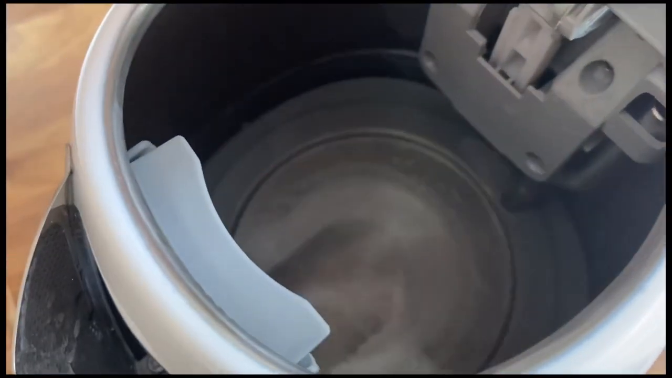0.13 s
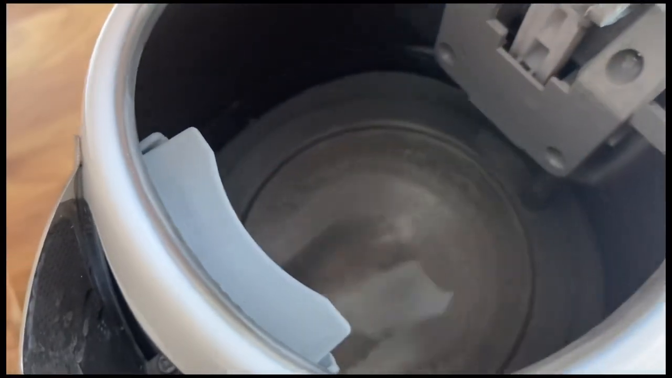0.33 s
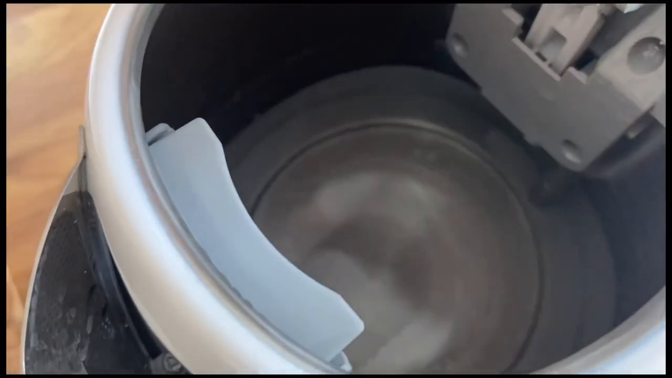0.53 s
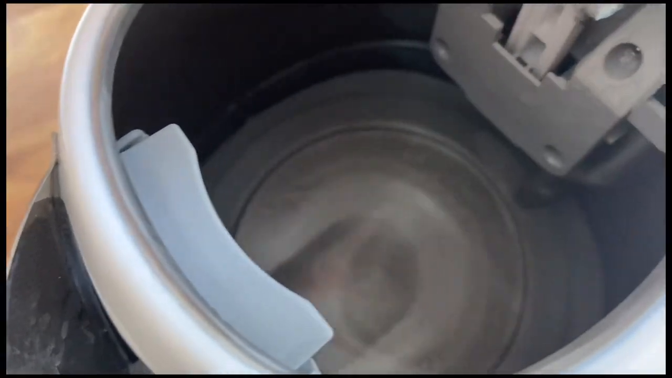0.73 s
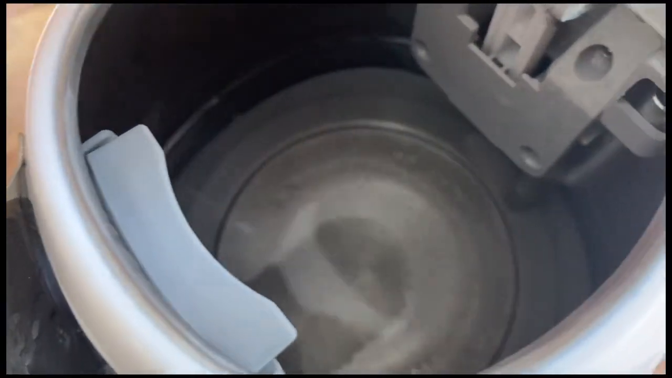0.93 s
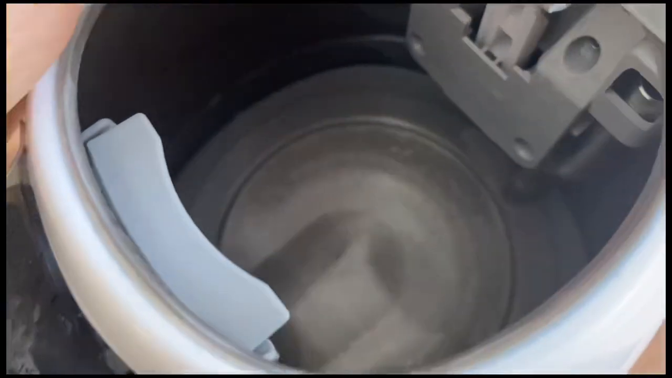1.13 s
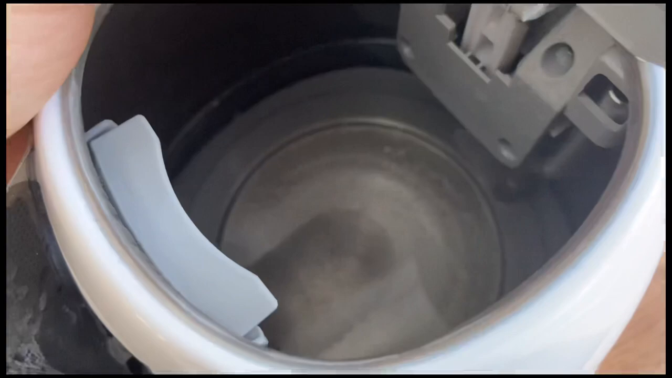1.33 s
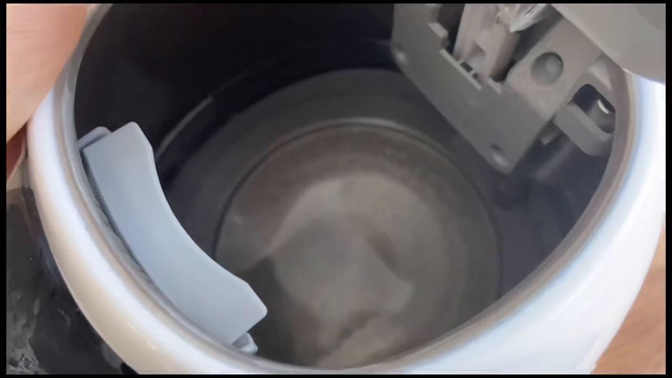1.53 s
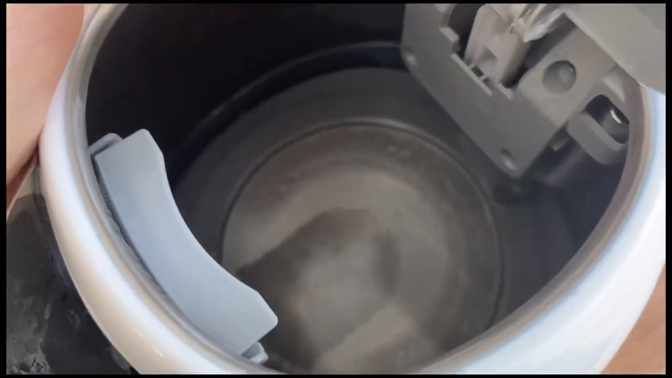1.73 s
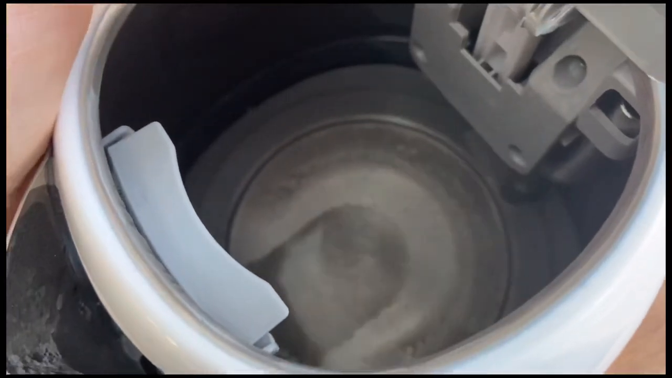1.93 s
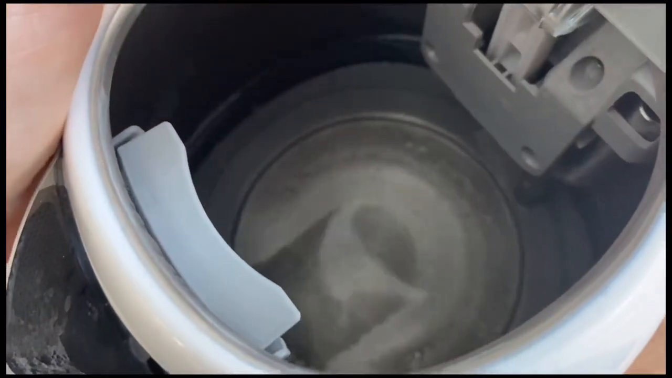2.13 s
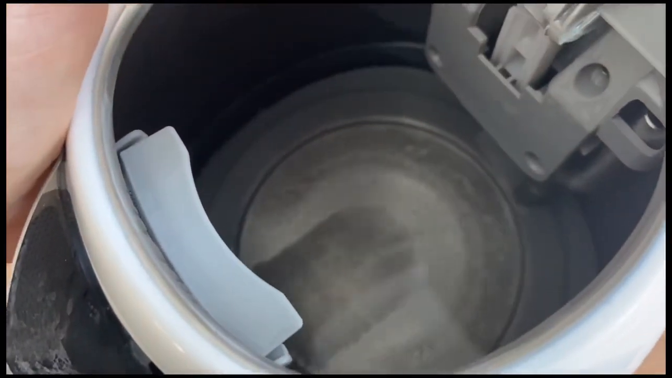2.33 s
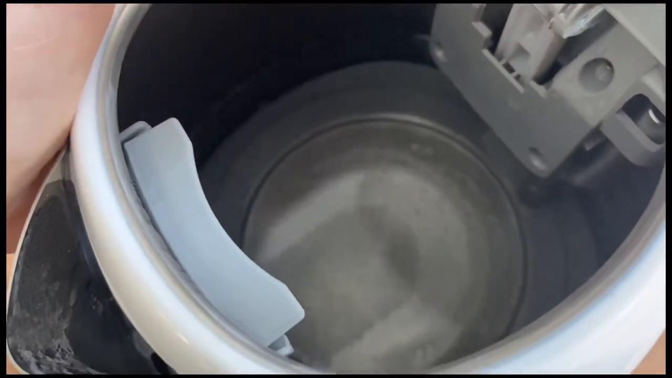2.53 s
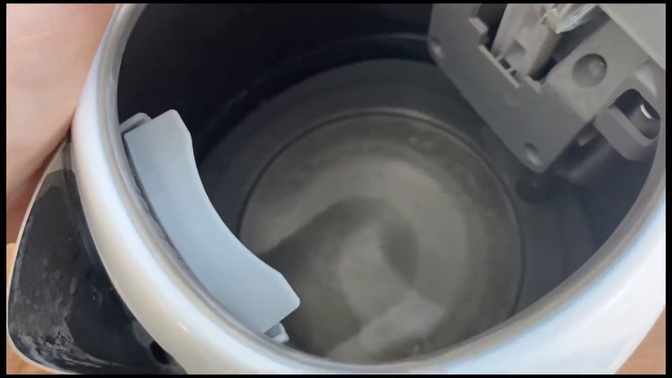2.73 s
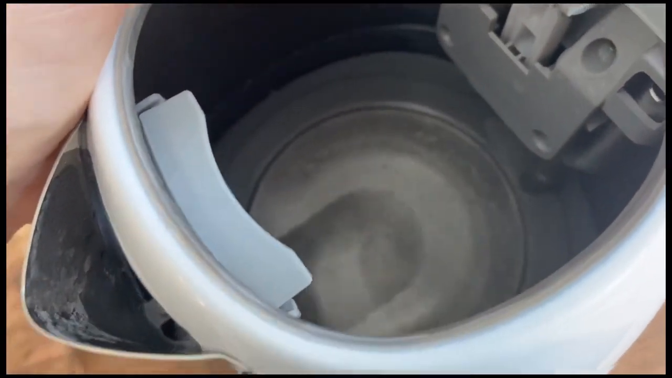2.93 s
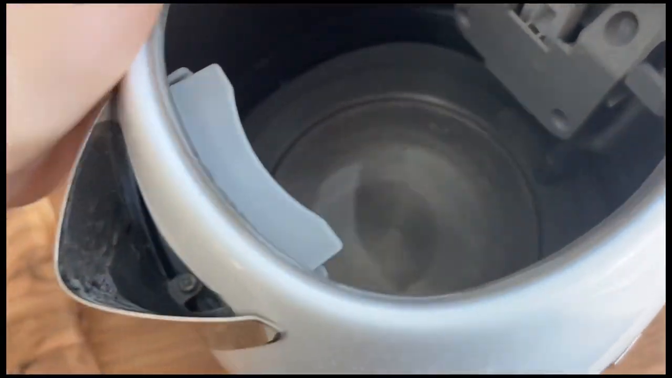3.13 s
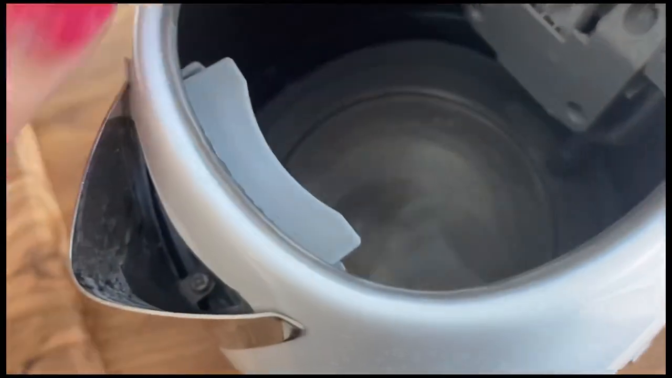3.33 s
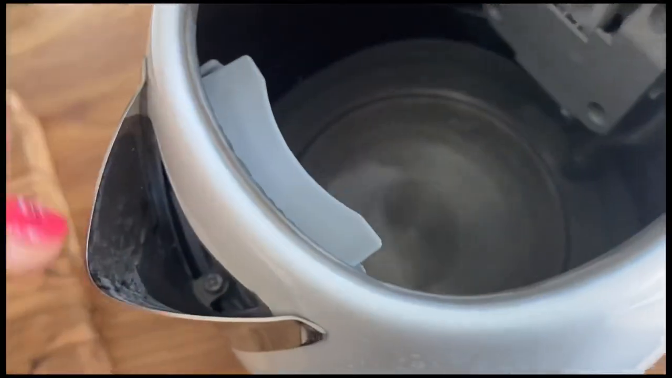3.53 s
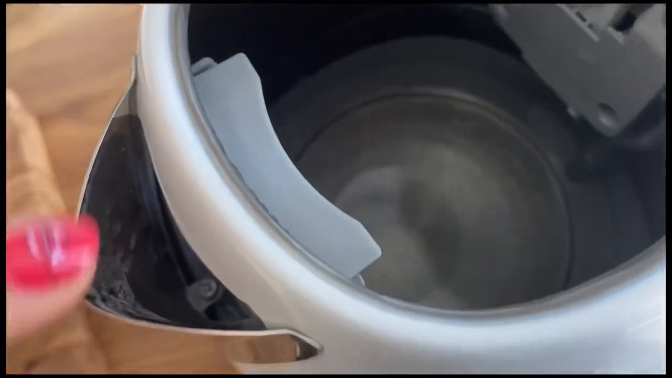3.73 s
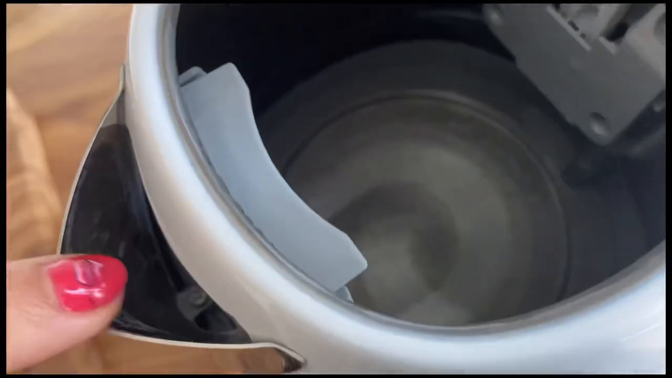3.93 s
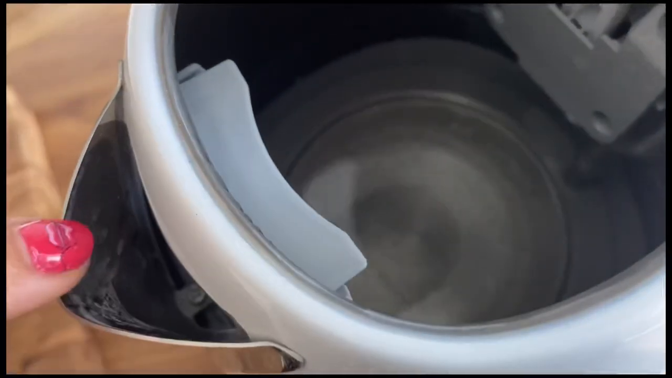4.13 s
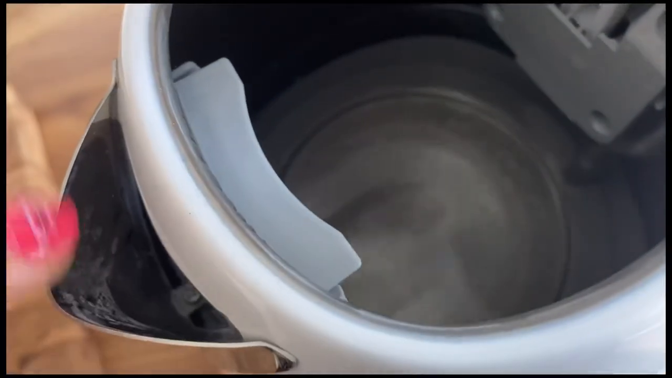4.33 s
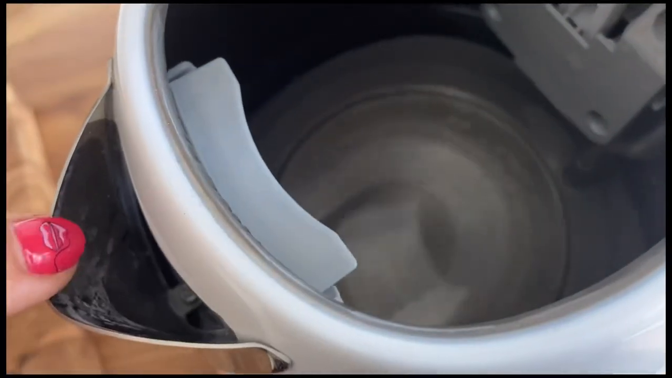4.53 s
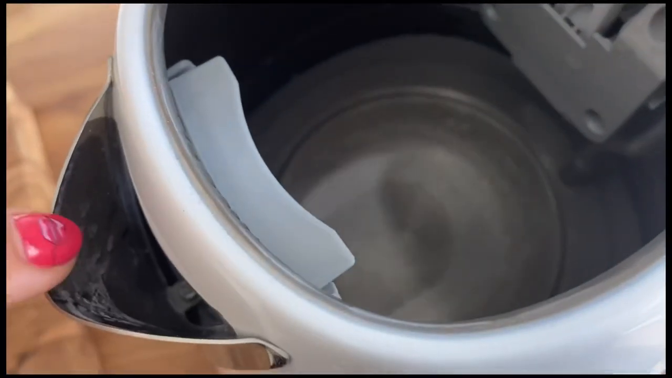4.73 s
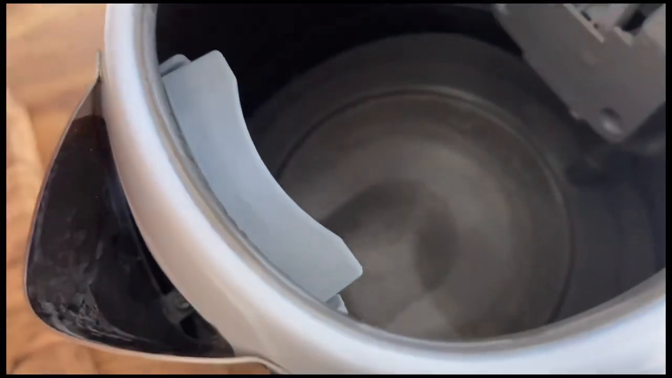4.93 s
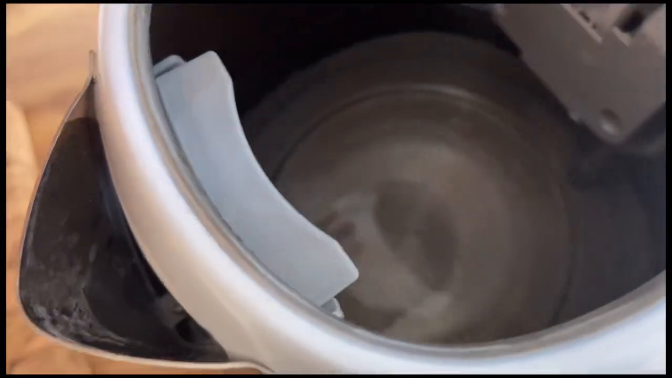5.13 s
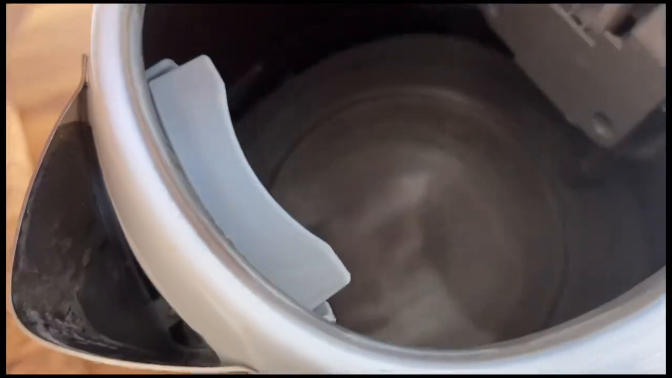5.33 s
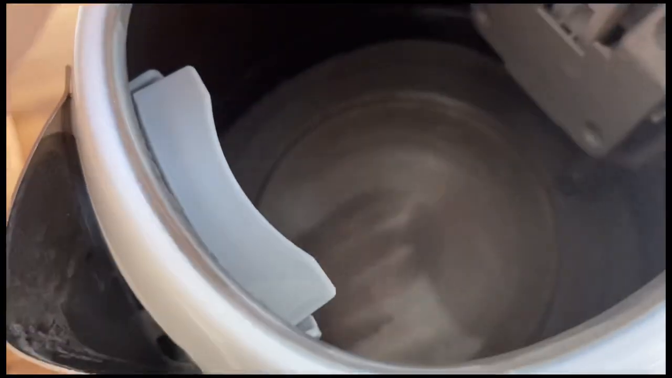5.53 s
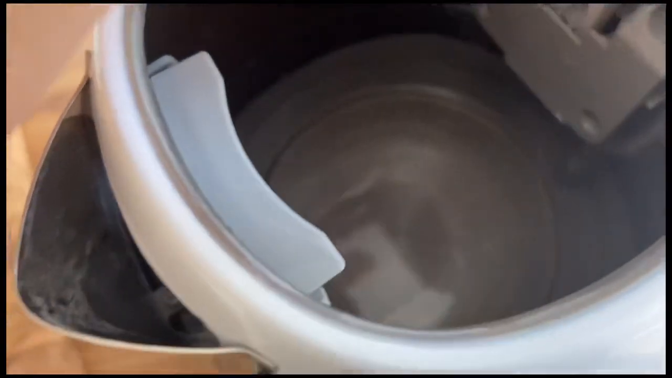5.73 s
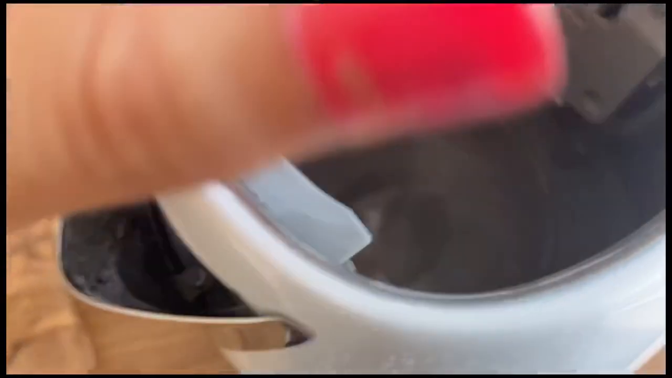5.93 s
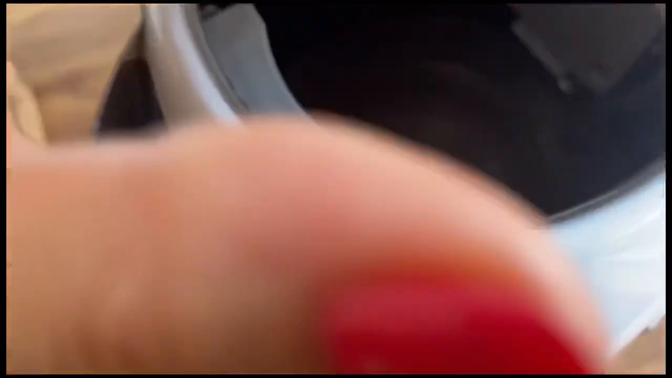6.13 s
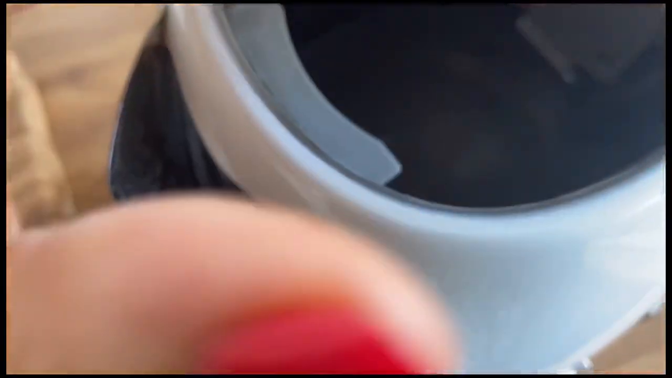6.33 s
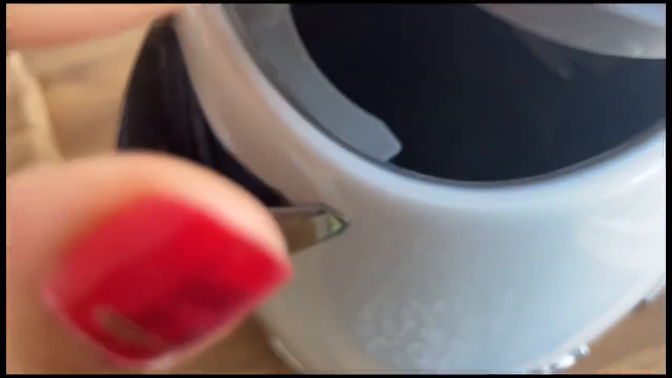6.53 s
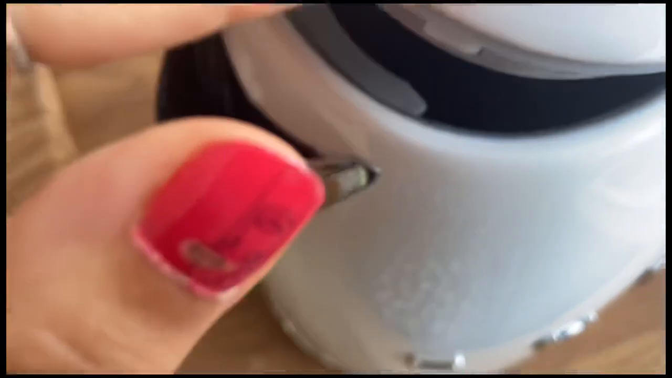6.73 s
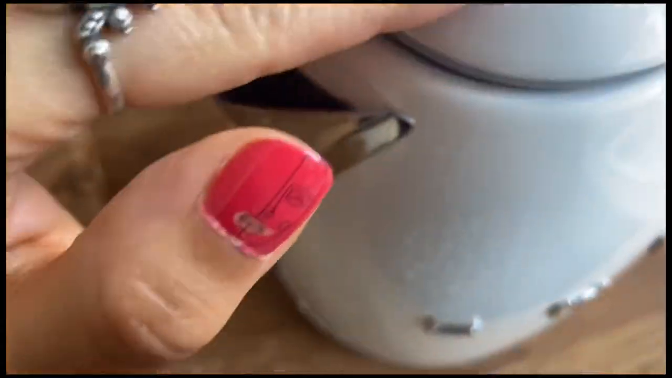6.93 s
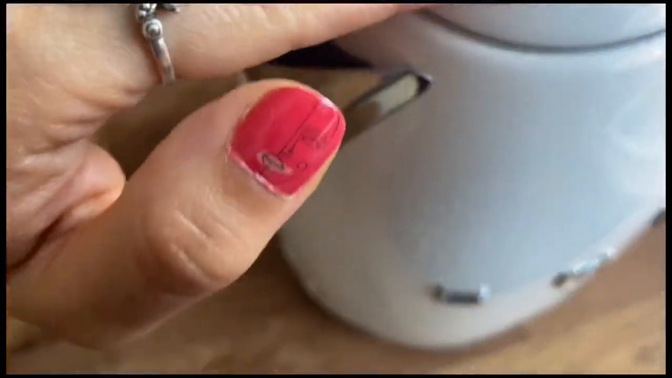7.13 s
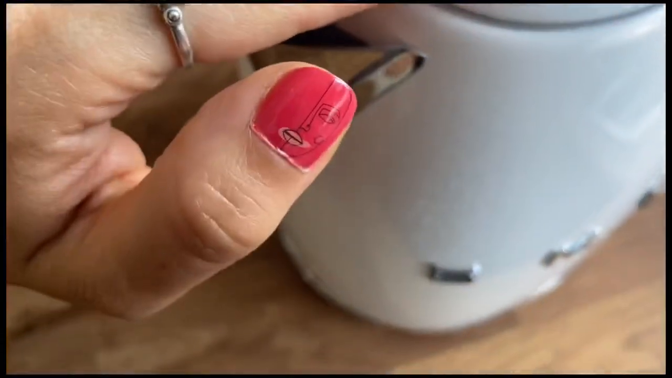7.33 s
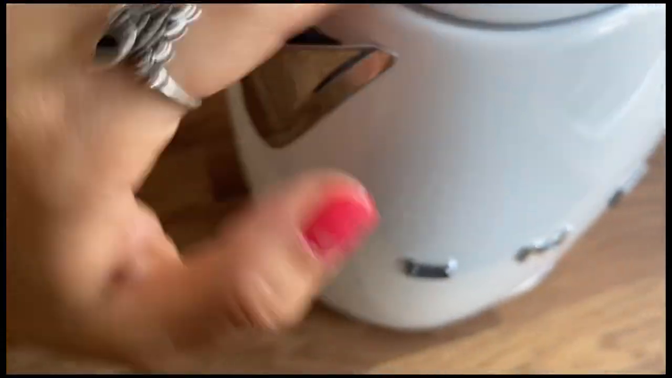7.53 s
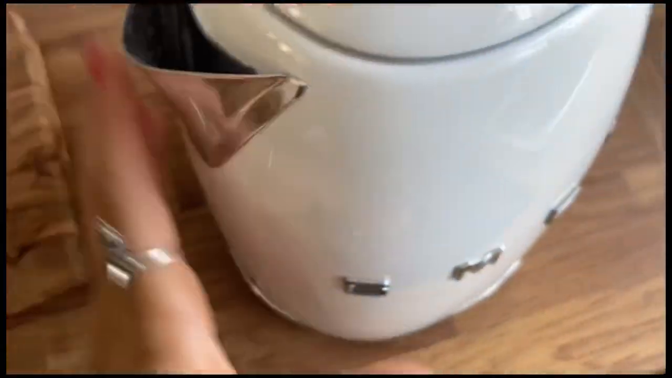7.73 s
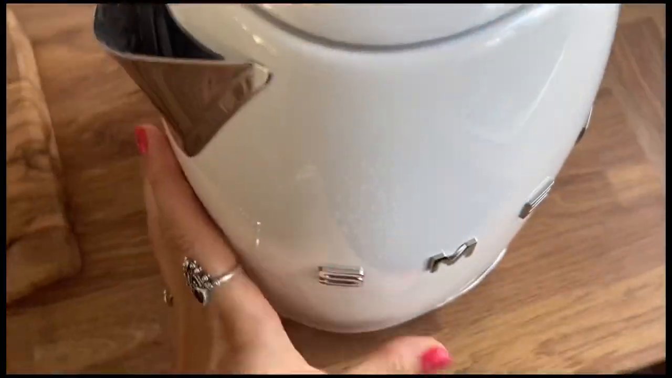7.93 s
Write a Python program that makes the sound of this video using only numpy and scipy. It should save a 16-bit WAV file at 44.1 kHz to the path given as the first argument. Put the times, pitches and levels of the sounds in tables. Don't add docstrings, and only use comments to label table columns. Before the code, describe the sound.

A quiet kitchen, heard close by a phone: low uneven rumble, faint hollow hum and thin hiss throughout. From 0 to 1.5 s only barely audible ticks and soft bumps of a hand on an empty kettle. At 1.7 s a clearer dull knock with a plastic tap booms briefly in the shell. Near silence follows until a loose run of small hollow bumps and light nail ticks at 3.1-3.5 s. Isolated faint taps come around 4.4 and 5.5 s. From 5.8 s the hand moves: skin rubs dryly on enamel, a small tick at 5.9, low soft thumps strongest near 6.2, nail ticks at 6.4 and 6.8. At 6.87 s the lid lands with a muffled clack; at 7.02 s the latch snaps, sharp and loudest, with tiny rapid rebounds, a short woody-metallic ring and room echo. Soft bumps at 7.5 and 8.0 s and faint brushes finish.

```python
import sys
import numpy as np
from scipy import signal
from scipy.fft import rfft, irfft, next_fast_len
from scipy.io import wavfile
from scipy.ndimage import uniform_filter1d

SR = 44100
rng = np.random.default_rng(int(sys.argv[2]) if len(sys.argv) > 2 else 0)


def generate_wav(signal):
    frames = np.transpose(np.atleast_2d(signal))
    scaled = np.clip(frames, -1, 1) * 32767
    pcm = np.round(scaled).astype(np.int16)
    wavfile.write(sys.argv[1], SR, pcm)


def voltage_ratio(level):
    return 10 ** (np.asarray(level, float) / 20)


N = 356019

# t/s, peak level/dB, boom f/Hz, knuckle knock level/dB
HELD_BUMPS = [(0.146, -47.5, 320, -37), (1.082, -50, 353, -38), (1.693, -34, 353, -6),
              (1.712, -39.5, 568, -10), (2.864, -58, 345, -28), (2.967, -50.5, 340, -36),
              (3.174, -49, 350, -13), (3.204, -38, 390, -2), (3.323, -48.5, 371, -24),
              (3.387, -44, 373, -4), (3.414, -51, 384, -22.5), (3.497, -47.5, 392, -17.5),
              (4.451, -51, 262.6, -37), (5.477, -44, 280, -22), (5.861, -49, 378, -3.5),
              (5.936, -29.5, 397.5, -11.5), (5.964, -42.5, 398, -12), (6.063, -40.5, 328, -30),
              (6.174, -22.5, 349, -15), (6.203, -24, 345.5, -8.5), (6.232, -67, 353, -32),
              (6.278, -35.5, 354, -15.5), (6.319, -35.5, 338, -10.5), (6.794, -41.5, 303, -7),
              (7.466, -53.5, 555, 0.5), (7.475, -35.5, 241, -17.5), (7.491, -45.5, 264, -10),
              (7.604, -50, 263, -21.5)]
# t/s, peak level/dB, boom f/Hz, knuckle knock level/dB
FREE_BUMPS = [(0.614, -50.5, 272, -9), (1.584, -39.5, 358.6, -16), (1.724, -33, 344, -2.5),
              (3.105, -41, 389, -14), (3.231, -40.5, 353.5, -9), (3.292, -45, 420, -10),
              (3.461, -47, 426, -11), (5.83, -63, 428, 6.5), (5.913, -36.5, 372, -14),
              (6.866, -21, 260.8, 2.5), (6.89, -37, 644, -29.5), (6.996, -30, 269, -23.5),
              (7.522, -54.5, 628, -17.5), (7.531, -37.5, 262, -20), (8.024, -37, 216.5, -16)]
# f/Hz, level/dB, t60/s
SHELL_MODES = [(288, 2, 0.94), (382, 3.5, 0.47), (435, 6, 0.32), (627, -22.5, 0.13), (1000, -19, 0.33),
               (1024, -17, 0.29)]
# f/Hz, level/dB, t60/s
WORKTOP_MODES = [(90, -4, 0.1), (111.5, -1.5, 0.2), (158, -6.5, 0.025)]
# t/s, peak level/dB, crowded wall modes level/dB
LID_BLOWS = [
    (6.868, -29.5, -6),
    (7.0177, -6.5, -17.5),
    (7.023, -13, -20.5),
    (7.028, -12.5, -22.5),
]
# f/Hz, level/dB, t60/s
CLOSED_MODES = [(86, -10, 0.074), (113, -3.5, 0.17), (157, 3, 0.13), (200, -13.5, 0.5), (262.6, -8.5, 0.43),
                (295, -2.5, 0.4), (403, -6, 0.31), (444, 0.5, 0.38), (548, -11.5, 0.27), (640, -7.5, 0.034),
                (706, -12, 0.11), (917, -5.5, 0.07), (1590, -35, .35)]
# t/s, peak level/dB, dull part level/dB, ring f/Hz
TAPS = [(0.5546, -85, 12, 1030), (0.894, -86, 14.5, 2330), (1.0758, -75, 9, 1400),
        (1.581, -74.5, 6.5, 1190), (1.648, -67.5, 14, 1160), (1.6574, -56.5, -21, 4500),
        (1.692, -74, 8, 1000), (1.712, -41.5, 0.5, 1220), (1.725, -26, 0, 1500), (2.2395, -68.5, -19, 4440),
        (3.2015, -56.5, 7, 1290), (3.881, -70.5, -12, 3611), (4.3137, -59.5, -27.5, 3600),
        (4.449, -61, -0.5, 2340), (5.472, -48.5, 4, 2270), (5.541, -81, 15, 2230), (5.567, -79, 17, 2200),
        (5.643, -61, 4, 2100), (5.88, -69, 1, 1740), (5.889, -38, 2.5, 3810), (5.9362, -48, 8, 1340),
        (6.1684, -55, 16, 1230), (6.267, -67, 1, 1590), (6.865, -26.5, -5, 810), (7.89, -67.5, 0.5, 1090)]
# t/s, peak level/dB, dull part level/dB, ring f/Hz
NAILS = [(6.416, -40, -7, 2280), (6.816, -42, -1.5, 2357), (0.608, -71.5, 9.5, 1040),
         (1.63, -58.5, 5, 1487), (3.1005, -55.5, -31, 4900), (3.228, -58.5, 4.5, 2350),
         (3.3693, -47, -27.5, 4700), (4.0861, -71, -16.5, 5200), (4.7483, -70.5, -7.5, 2460),
         (4.934, -74.5, -14, 1012), (5.7687, -79, 10.5, 2410), (5.829, -67, -2, 1380),
         (5.9736, -51, -8.5, 1380), (6.079, -57.5, -23, 1420), (6.0984, -55.5, 0, 1880),
         (6.197, -51.5, 3.5, 1250), (6.209, -49, -4, 1040), (6.8631, -32, 2, 1695), (7.467, -63, -7, 869),
         (7.484, -64.5, -3, 1025), (7.522, -62, -0.5, 1050), (7.6128, -72.5, -15, 1120),
         (8.021, -63.5, -0.5, 1080)]
# t/s, peak level/dB, dull part level/dB, ring f/Hz, rattle length/s
LATCH = [
    (7.0152, -26.5, 4.5, 2360, 0.0051),
    (7.0165, -22.5, 5, 5300, 0.0011),
    (7.0173, -14, -12.5, 840, 0.0013),
    (7.0232, -17, 0, 5586, 0.0024),
]
# f/Hz, level/dB, t60/s
STEEL_MODES = [(1250, -2, .04), (1640, -4, .04), (2080, -2, .04), (2350, -2, .045), (2760, -2, .04),
               (3180, -6, .03), (3870, -3, .035), (4500, -6, .03), (5200, -5, .03), (5700, -6, .025)]
# t/s, level/dB
AJAR_BLOW = (6.866, -40)
SHUT_BLOW = (7.019, -37.5)
# f/Hz, level/dB, t60/s
AJAR_MODES = [(608, -1.5, .4), (653, -3, .4), (768, -0.5, .19), (1150, -13.5, .13), (1340, -9.5, .24),
              (1700, -19, 0.21), (2008, -20.5, .27), (2175, -10.5, .22), (2400, -2.5, .16),
              (3000, -16, .15), (3740, -20.5, .19), (4230, -14, 0.2)]
# f/Hz, level/dB, t60/s
SHUT_MODES = [(614, -10, 0.35), (915, -16.5, 0.79), (1010, -15.5, 0.18), (1260, -13.5, 0.28),
              (1437, -5.5, 0.21), (1500, -20.5, 0.5), (2010, -15, 0.33), (2083, -12, 0.21),
              (2336, -15, 0.2), (2690, 0.5, 0.13), (3176, -4, 0.12), (3483, -23, 0.39), (3800, -18.5, 0.23),
              (4048, -23.5, 0.26)]
# t/s, level/dB, f/Hz, t60/s
PINGS = [(0.609, -59, 1000, .04), (0.895, -66, 2400, .04), (0.893, -68, 2830, .03), (1.075, -74, 5350, .03),
         (1.7125, -32, 1235, 0.019), (1.7242, -14.5, 1288, 0.012), (1.7273, -33.5, 2850, 0.028),
         (1.7249, -26.5, 1053, 0.034), (4.2, -76, 3190, .08), (6.271, -52, 1105, .03),
         (5.472, -49.5, 3780, .03), (6.8659, -25.5, 1730, .02), (6.865, -25.5, 792, .03),
         (6.866, -27.5, 420, .04), (7.0163, -11, 877, 0.028), (7.019, -19.5, 434, .04),
         (3.105, -63, 2390, 0.088), (3.229, -65, 1396, 0.18), (3.337, -72, 2340, 0.083),
         (3.3697, -49.5, 3580, 0.021), (3.3695, -47, 4810, 0.046), (3.3697, -43, 5900, .03),
         (3.369, -58, 2390, 0.036), (3.46, -57.5, 800, 0.027), (3.291, -58.5, 750, .03),
         (5.831, -48, 710, 0.02), (5.85, -56, 800, 0.038), (5.874, -41, 1730, 0.024),
         (5.878, -45, 844, 0.028), (5.891, -49, 2120, .04), (5.92, -46, 1300, 0.026),
         (5.938, -39.5, 2520, 0.044), (6.051, -52.5, 1000, .02), (6.053, -50, 343, 0.084),
         (6.076, -39, 405, 0.059), (6.091, -40, 388, 0.046), (6.104, -38, 370, 0.057),
         (6.121, -44.5, 382, 0.055), (6.989, -35.5, 627, 0.045), (6.999, -31.5, 680, .04),
         (7.003, -31, 1000, 0.05), (7.009, -24.5, 600, 0.04),
         (0.532, -72, 1150, .03), (0.547, -70, 900, .03), (0.557, -78, 2500, .03), (0.612, -73, 2300, .04),
         (0.615, -68, 1450, .04), (0.628, -70, 850, .05), (1.074, -70, 2500, .04), (1.074, -71, 1150, .04),
         (3.228, -62, 2050, .05), (3.203, -57, 2800, 0.032), (5.472, -51.5, 2050, 0.083),
         (5.472, -52, 4850, 0.038), (5.472, -61, 2850, 0.027), (5.567, -66.5, 3900, 0.037),
         (5.567, -65, 1900, .03), (5.643, -63, 4400, .04), (5.889, -39, 3850, 0.045),
         (5.889, -51, 6500, .03), (5.937, -48, 5150, .04), (5.937, -45, 1850, 0.056),
         (6.4165, -45, 5200, .03), (6.4165, -38, 6300, .03), (6.4165, -56, 4300, .03),
         (6.817, -46, 3850, 0.043), (6.2, -54, 4900, 0.035), (7.0245, -30.5, 2900, .02),
         (7.021, -32.5, 5400, .012)]
# t/s, level/dB
SPOUT_TOUCHES = [
    (0.624, -73),
    (1.079, -73),
    (3.226, -60.5),
    (5.482, -54),
    (5.572, -65),
    (5.643, -65.5),
]
# t of full pressure/s, hold/s, dull level/dB, sheen level/dB
STROKES = [(1.068, 0.0039, -82, -75), (1.339, .03, -88.5, -81.5), (1.472, 0.0099, -89, -73),
           (1.572, 0.039, -82, -74), (3.054, 0.14, -88, -67.5), (3.085, 0.027, -77.5, -64.5),
           (3.211, 0.014, -66.5, -71), (3.339, 0.03, -79, -71), (5.87, 0.017, -65, -77),
           (6.419, 0.003, -71.5, -65), (6.865, .005, -54.5, -87), (7, 0.014, -49.5, -53.5),
           (7.621, 0.011, -98.5, -78.5), (7.787, 0.032, -92, -72), (7.904, 0.0054, -76.5, -73),
           (7.957, 0.036, -99, -66.5), (8.029, 0.01, -76.5, -75.5), (8.041, 0.029, -76, -85)]
# t/s, pressure level/dB, sheen over dull level/dB
SLIDE = [
    (5.81, -95.5, 10),
    (5.83, -62, -2),
    (5.99, -61.5, -22),
    (6.03, -67, -1.5),
    (6.16, -65, -9.5),
    (6.32, -62.5, -2.5),
    (6.6, -64.5, -5),
    (6.8, -61.5, -9.5),
    (6.99, -71.5, -16),
]
# f/Hz, level/dB
RUB_COLOUR = [(700, -2.5), (1000, -14), (1250, -15), (1400, 0), (1550, -4), (1800, -3), (2050, -7),
              (2400, -5), (2650, -9), (3300, -18), (3800, -11.5), (4500, -38.5)]
# f/Hz, level/dB
RUB_SHEEN = [(2500, -31), (4000, -5.5), (5500, -3.5), (8000, 1), (11000, -5.5), (14000, -7.5), (15600, -12),
             (15900, -46)]
# f/Hz, width/Hz, level over the hiss/dB
SUNG_MODES = [(800, 60, 4.5), (1376, 33, 5.5), (1640, 64, 6), (1900, 40, 5), (2050, 40, 4), (2230, 66, 4.5),
              (2380, 62, 4.5), (2870, 50, 8)]
# t/s, then level/dB in each clap band
CLAPS = [
    (1.7245, -21.5, -24, -23.5, -35.5),
    (6.866, -30, -28, -28, -30),
    (7.018, -18, -20, -16, -16),
]
CLAP_HZ = (1200, 2800, 4600, 10000)
# f/Hz, t60/s, level/dB
ROOM = [(300, 0.9, -14), (750, 0.29, -14.5), (1300, 0.53, -13), (3150, .35, -9), (5900, 0.23, -21.5),
        (10300, 0.4, -14)]
# f/Hz, level/dB
CLOSE_TREBLE = [(2500, 1), (4000, -1), (12000, -2.5), (13000, -10), (14300, -9.5), (15000, 0.5)]
# t/s, left minus right level/dB
PLACE = [
    (0, -1),
    (3.3, 1.5),
    (6.2, -1),
    (6.9, -2),
    (7.05, -2.5),
    (8.07, -2),
]
# f/Hz, phase/rad
PORT_LEAD = [(0, 0.45), (1700, 0.08), (2500, 1.7), (4200, 1.42), (5400, 0.69), (6700, 3.525), (8300, 3.43),
             (16000, 13.5)]
# f/Hz, phase/rad
LID_LEAD = [(0, 0), (350, -0.33), (730, 0.84), (2500, 0.5), (4200, 2), (5200, 6.5), (8100, 10.5),
            (16000, 17.5)]
# f/Hz, level/dB
SUM_COLOUR = [(6500, -1), (6900, -45), (8050, -45), (8300, 0.5), (12200, 1), (12600, -45), (14300, -45),
              (14600, -1.5), (15700, -2), (15950, -45)]
# f/Hz, level/dB
DIFFERENCE_COLOUR = [(60, -13), (150, -9.5), (600, 3.5), (3000, -2), (5000, -4), (8800, 2), (9400, -14.5),
                     (10800, -19.5), (11500, 1)]
# t/s, level below 100 Hz/dB, length/s
SHAKES = [(0.219, -45, 0.083), (0.455, -71, .06), (0.597, -57, 0.12), (1.467, -59, 0.38),
          (1.654, -55, 0.14), (2.292, -55.5, 0.2), (3.499, -57.5, 1), (3.991, -53.5, 0.1),
          (4.212, -57.5, 0.13), (4.515, -54.5, 0.18), (4.838, -52.5, 0.11), (5.054, -60, 0.072),
          (5.312, -59, 0.059), (5.442, -46.5, 0.1), (5.927, -55, 0.13), (6.06, -44.5, 0.11),
          (6.199, -39.5, 0.081), (6.417, -51.5, 0.24), (6.678, -50.5, 0.084), (6.853, -51, 0.09),
          (7.052, -53, 0.23), (7.326, -72, 0.039), (7.51, -54.5, 0.15), (7.704, -69, 0.22)]
# f/Hz, level per Hz/dB
HUM_COLOUR = [(59, -34), (100, 0), (205, -10), (257, -2), (291, -4), (356, -2), (383, -5.5), (485, -19.5),
              (531, -19.5), (605, -32.5), (700, -31.5), (910, -44), (1540, -120)]
# t/s, level/dB
HUM_LEVEL = [(0, -62), (2, -64), (3, -61), (3.4, -58), (3.7, -63.5), (5.7, -62), (6.1, -55), (6.8, -61.5),
             (7.4, -61.5), (7.8, -62), (8.07, -66.5)]
# f/Hz, level per Hz/dB
HISS_COLOUR = [(320, -28), (550, -3), (580, -20.5), (678, -20), (858, -20), (2140, -25), (5210, -28.5),
               (6850, -35), (9380, -36), (12500, -34.5), (16200, -66), (22000, -120)]


def seconds(length):
    return np.arange(int(length * SR)) / SR


def filtered(x, gain):
    size = next_fast_len(x.shape[-1], real=True)
    hz = np.fft.rfftfreq(size, 1 / SR) + 1
    return irfft(rfft(x, size) * gain(hz), size)[..., :x.shape[-1]]


def colour(x, points):
    hz, db = np.transpose(points)
    return filtered(x, lambda f: voltage_ratio(np.interp(np.log(f), np.log(hz), db)))


def band(x, lo_hz, hi_hz):
    sos = signal.butter(2, [lo_hz, min(hi_hz, .45 * SR)], "band", fs=SR, output="sos")
    return signal.sosfilt(sos, x)


def unit(x):
    return x / np.sqrt(np.mean(x ** 2))


def peak(x):
    return x / np.max(np.abs(x))


def first(x):
    return x / np.max(np.abs(x[0]))


def ring(t, hz, db, t60):
    hz, db, t60 = (np.asarray(v, float)[:, None] for v in (hz, db, t60))
    return np.sum(voltage_ratio(db - 60 * t / t60) * np.sin(2 * np.pi * hz * t), 0)


def walk(rate):
    k = int(SR / rate)
    return uniform_filter1d(np.repeat(rng.standard_normal(N // k + 1), k), k)[:N]


def curve(rows):
    s, db = np.transpose(rows)
    level = np.interp(np.arange(N) / SR, s, db, -200, -200)
    return uniform_filter1d(voltage_ratio(level), size=300)


def stereo(points, alike):
    mid, side = rng.standard_normal((2, N))
    pair = np.sqrt(1 + alike) * mid + np.sqrt(1 - alike) * side * np.array([[1], [-1]])
    return unit(colour(pair, points))


def add(out, s, sound):
    i = int(s * SR)
    out[..., i:i + sound.shape[-1]] += sound[..., :N - i]


def bumps():
    held_ring_s, free_ring_s = .09, 0.24
    out, t = np.zeros(N), seconds(.35)
    hz, db, t60 = np.transpose(SHELL_MODES)
    swell = peak((t * np.exp(-t / 0.0046)) ** 1.5)
    thump = peak(ring(t, *np.transpose(WORKTOP_MODES)) * (1 - np.exp(-t / 0.0082)))
    for rows, ring_s in ((HELD_BUMPS, held_ring_s), (FREE_BUMPS, free_ring_s)):
        for s, top_db, boom, knock_db in rows:
            luck = rng.standard_normal(len(hz))
            noise = rng.standard_normal(len(t))
            near_db = db - 9 * np.abs(np.log2(hz / boom)) + 4 * luck
            shell = peak(ring(t, hz, near_db, 0.54 * t60))
            forced = swell * np.sin(2 * np.pi * boom * t)
            free = ring(t, [boom, 1.5 * boom], [-5, -10], [ring_s, 0.43 * ring_s])
            free += voltage_ratio(-6.0) * shell
            body = peak(forced + free * (1 - np.exp(-t / 0.0096)) ** 2)
            scuff = noise * voltage_ratio(-60 * t / 0.056) * (1 - np.exp(-t / 0.0015))
            knock = peak(band(scuff, 350, 760))
            thump_db = -16 - 0.18 * (top_db + 40)
            add(out, s - .003, voltage_ratio(top_db) * (body + voltage_ratio(knock_db) * knock + voltage_ratio(thump_db) * thump))
    return out


def snap():
    out, t = np.zeros(N), seconds(.6)
    hz, db, t60 = np.transpose(CLOSED_MODES)
    deep = hz < 130
    quick = voltage_ratio(-10.5) + np.exp(-t / 0.022)
    for s, top_db, crowd_db in LID_BLOWS:
        luck_db = db + 3 * rng.standard_normal(len(hz))
        modes = ring(t, hz[~deep], luck_db[~deep], t60[~deep]) * quick
        modes += voltage_ratio(1.0) * ring(t, hz[deep], luck_db[deep], 1.4 * t60[deep])
        cavity = band(rng.standard_normal(len(t)), 420, 930)
        crowd = peak(cavity * voltage_ratio(-60 * t / 0.34) * quick)
        add(out, s, voltage_ratio(top_db) * (peak(modes) + voltage_ratio(crowd_db) * crowd))
    return band(out, 55, 12000)


def spout():
    hz, t60 = 1390, .11
    out, t = np.zeros(N), seconds(0.24)
    for s, db in SPOUT_TOUCHES:
        add(out, s, ring(t, [hz, 1.015 * hz], [db, db - 7], [t60, t60 / 2]))
    return out


def ticks():
    out, t = np.zeros((2, N)), seconds(.08)
    hz, db, t60 = np.transpose(STEEL_MODES)
    onset = 1 - np.exp(-t / 0.00056)
    contacts = [(*row, 0.0052, -19.5) for row in TAPS]
    contacts += [(*row, .005, 0) for row in NAILS]
    contacts += [(*row, -0.5) for row in LATCH]
    for s, top_db, dull_db, own_hz, length, bright_db in contacts:
        noise = rng.standard_normal(len(t))
        luck = rng.standard_normal(len(hz))
        rattle = noise * np.exp(-t / length) * onset
        clap = (t == 0) * np.sqrt(np.sum(rattle ** 2))
        rattle = np.array([rattle, clap])
        dull_hz = min(own_hz, 2400)
        crack = first(band(band(rattle, 2600, 8200), 2200, 14500))
        crack += voltage_ratio(bright_db) * first(band(rattle, 9100, 12000))
        crack += voltage_ratio(bright_db - 8.5) * first(band(rattle, 13000, 18000))
        crack += voltage_ratio(dull_db - 4.0) * first(band(rattle, 0.77 * dull_hz, 1.765 * dull_hz))
        wall = ring(t, hz, db + np.where(hz < 2600, dull_db, 0) + 3 * luck, .7 * t60)
        own_db = (dull_db if own_hz < 2700 else -2) + 3.5
        tone = onset * (voltage_ratio(-18.5) * wall + ring(t, [own_hz], [own_db], [.012]))
        add(out, s - .0005, voltage_ratio(top_db + 5.5) * (crack + voltage_ratio([[0], [-8.5]]) * tone))
    return out


def walls():
    out, t = np.zeros(N), seconds(0.37)
    for (s, top_db), modes in ((AJAR_BLOW, AJAR_MODES), (SHUT_BLOW, SHUT_MODES)):
        hz, db, t60 = np.transpose(modes)
        t60 = np.minimum(t60, .33)
        pair = ring(t, hz, db, t60) + ring(t, 1.012 * hz, db - 4, t60)
        add(out, s, voltage_ratio(top_db) * pair)
    t = seconds(.12)
    rise_cycles = 0.58
    for s, db, hz, t60 in PINGS:
        add(out, s, ring(t, [hz], [db], [t60]) * (1 - np.exp(-t * hz / rise_cycles)))
    return out


def sung(x):
    def gain(f):
        return 1 + sum(voltage_ratio(db) / (1 + (2 * (f - hz) / width) ** 2) for hz, width, db in SUNG_MODES)
    return filtered(x, gain)


def patchy(x, edges_hz, spread_db, rate):
    below = [0 * x] + [filtered(x, lambda f: f < hz) for hz in edges_hz] + [x]
    return sum((hi - lo) * voltage_ratio(spread_db * walk(rate)) for lo, hi in zip(below, below[1:]))


def rubs():
    press_db_per_s, lift_db_per_s = 1098.5, 550.5
    grain = voltage_ratio(2.0 * walk(70) + 1.8 * walk(500)) * rng.standard_normal(N)
    dull = patchy(unit(sung(colour(grain, RUB_COLOUR))), (1100, 1520, 2050), 1.8, 18)
    sheen = patchy(unit(colour(grain, RUB_SHEEN)), (7500, 13500), 1.4, 40)
    t, slide = np.arange(N) / SR, np.array(SLIDE)
    sheen_over_dull = voltage_ratio(np.interp(t, slide[:, 0], slide[:, 2]))
    out = curve(slide[:, :2]) * (dull + sheen * sheen_over_dull)
    for s, hold, dull_db, sheen_db in STROKES:
        part = slice(int((s - .1) * SR), int((s + hold + .1) * SR))
        late = t[part] - s
        press_or_lift = np.minimum(press_db_per_s * late, lift_db_per_s * (hold - late))
        touch = voltage_ratio(np.minimum(0, press_or_lift))
        out[part] += touch * (voltage_ratio(dull_db) * dull[part] + voltage_ratio(sheen_db) * sheen[part])
    return out


def claps():
    out, t = np.zeros(N), seconds(.02)
    click = 1. * (t == 0)
    for s, *dbs in CLAPS:
        pulse = sum(voltage_ratio(db) * band(click, hz / 1.7, hz * 1.45) for hz, db in zip(CLAP_HZ, dbs))
        add(out, s, pulse)
    return out


def kitchen(x):
    t = seconds(0.5)
    early = (1 - np.exp(-t / 0.00077)) * (1 + 5.0 * np.exp(-t / 0.015))
    noise = rng.standard_normal((2, len(t))) * early
    tail = 0
    for hz, t60, db in ROOM:
        decay = voltage_ratio(-60 * t / t60) / np.sqrt(t60 * SR / 14)
        tail = tail + voltage_ratio(db) * band(noise, hz / 2, hz * 2.3) * decay
    return signal.fftconvolve(x[None], tail, axes=1)[:, :N]


def ports(x):
    move_s = 6.7
    pan_db = np.interp(np.arange(N) / SR, *np.transpose(PLACE))
    bass = signal.sosfilt(signal.butter(1, 150, fs=SR, output="sos"), x)
    parts = np.split((x - bass)[None], [int(move_s * SR)], axis=1)
    half_turn = np.array([[.5j], [-.5j]])
    turned = [filtered(part, lambda f: np.exp(half_turn * np.interp(f, *np.transpose(lead))))
              for part, lead in zip(parts, (PORT_LEAD, LID_LEAD))]
    return bass + np.hstack(turned) * voltage_ratio(np.array([pan_db, -pan_db]) / 2)


def matrix(x):
    both = colour((x[0] + x[1]) / 2, SUM_COLOUR)
    apart = colour((x[0] - x[1]) / 2, DIFFERENCE_COLOUR)
    return np.array([both + apart, both - apart])


def background():
    house_db, hiss_db = -64, -77.5
    deep = stereo([(20, -38), (35, -2.5), (50, 13), (70, 2), (110, -10.5), (200, -50), (500, -99)], 0.7)
    t = np.arange(N) / SR
    shake = voltage_ratio(house_db)
    for s, db, length in SHAKES:
        shake = shake + voltage_ratio(db) * np.exp(-(2 * (t - s) / length) ** 2)
    deep = deep * voltage_ratio(2.7 * walk(12.0)) * shake
    hum = stereo(HUM_COLOUR, 0.71) * voltage_ratio(2 * walk(21)) * curve(HUM_LEVEL)
    return deep + hum + stereo(HISS_COLOUR, -0.13) * voltage_ratio(hiss_db)


def scene():
    body = bumps() + snap() + spout()
    blows, sent = colour(body + ticks(), CLOSE_TREBLE)
    notes, skin = walls(), rubs()
    echo = kitchen(sent + claps() + skin + voltage_ratio(-7.5) * notes)
    return ports(blows + notes) + matrix(ports(skin) + echo + background())


def band_limit(x):
    return signal.sosfilt(signal.butter(12, 16970, fs=SR, output="sos"), x)


def record(dry):
    low_cut = signal.butter(2, 30, "high", fs=SR, output="sos")
    top_cut = signal.ellip(8, .2, 60, 16200, fs=SR, output="sos")
    mix = signal.sosfilt(top_cut, signal.sosfilt(low_cut, dry))
    return band_limit(mix)


dry = scene()
out = record(dry)
generate_wav(out)
```